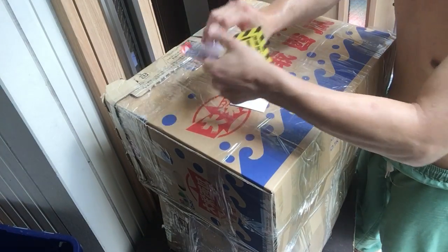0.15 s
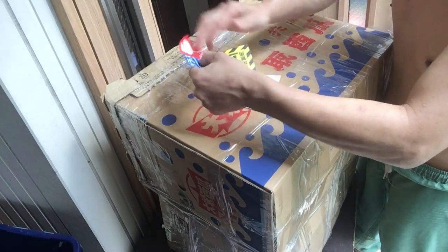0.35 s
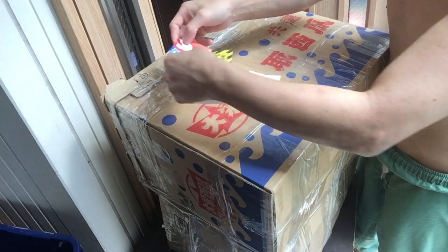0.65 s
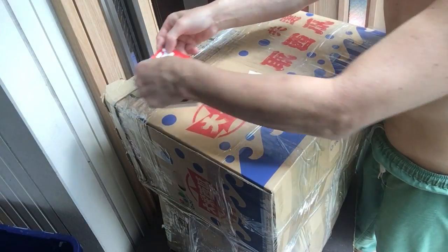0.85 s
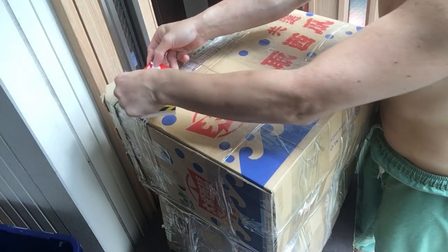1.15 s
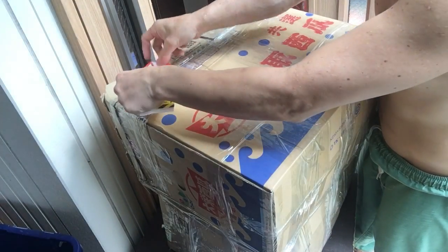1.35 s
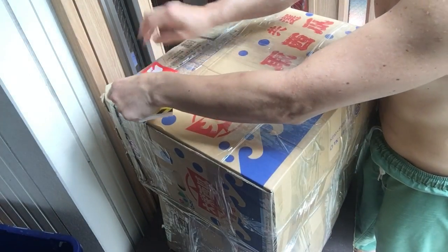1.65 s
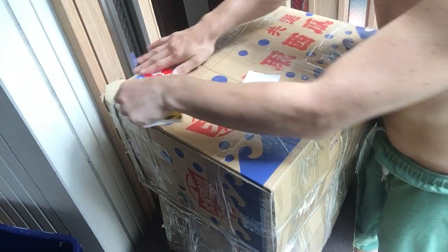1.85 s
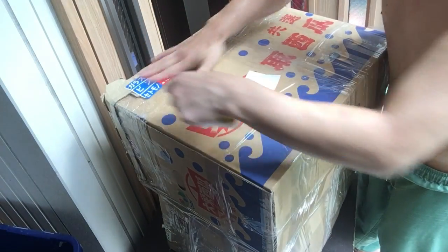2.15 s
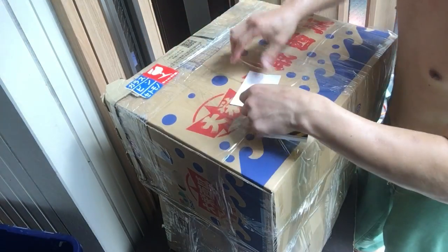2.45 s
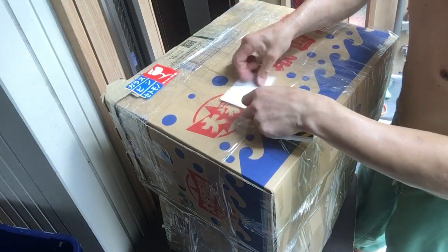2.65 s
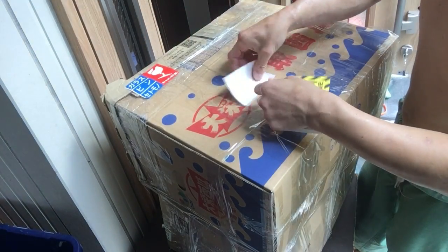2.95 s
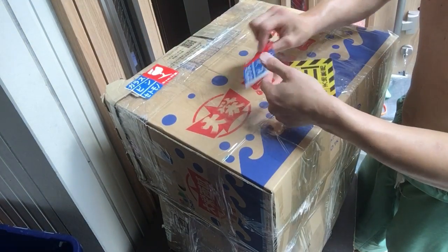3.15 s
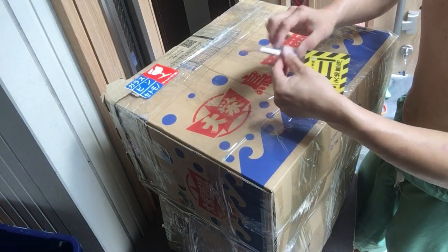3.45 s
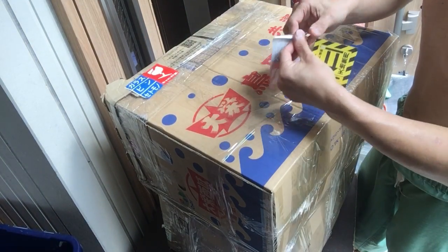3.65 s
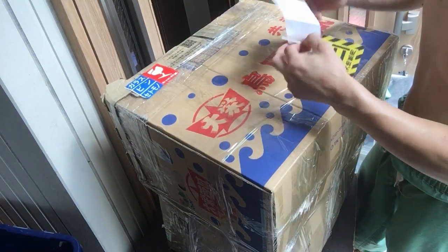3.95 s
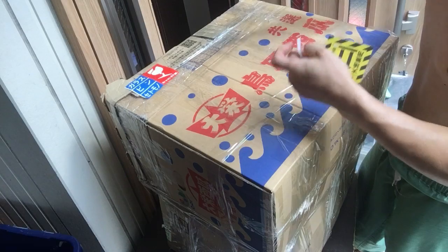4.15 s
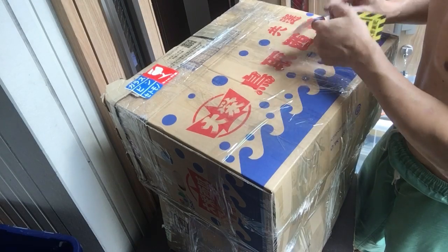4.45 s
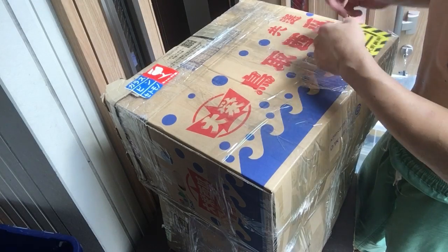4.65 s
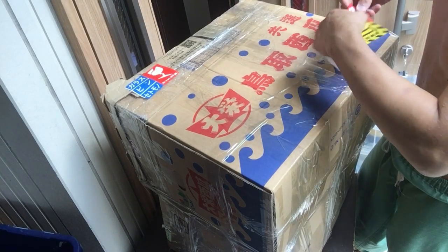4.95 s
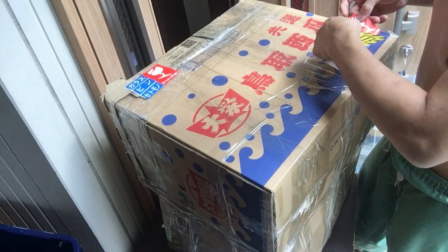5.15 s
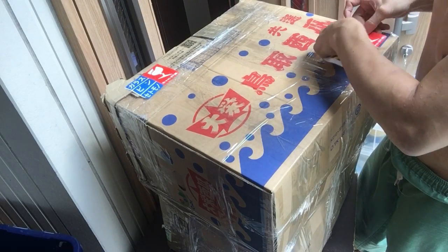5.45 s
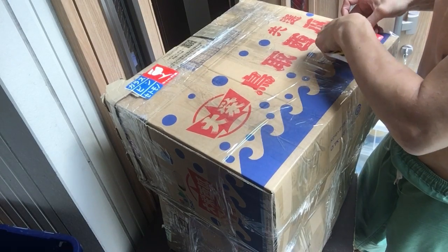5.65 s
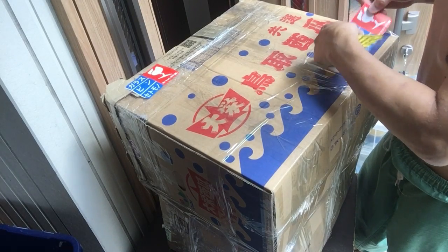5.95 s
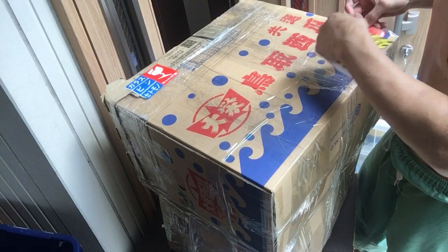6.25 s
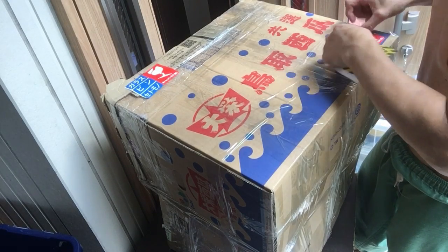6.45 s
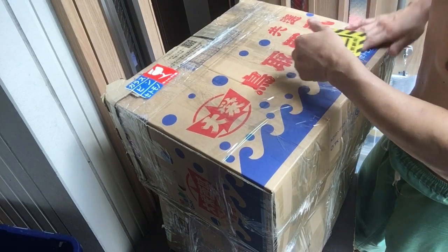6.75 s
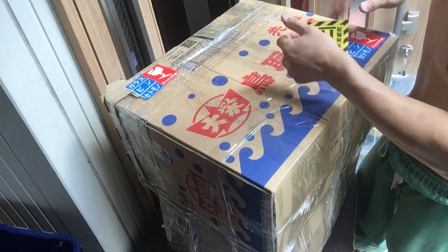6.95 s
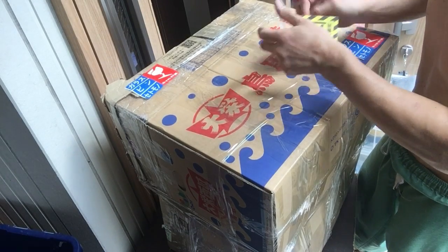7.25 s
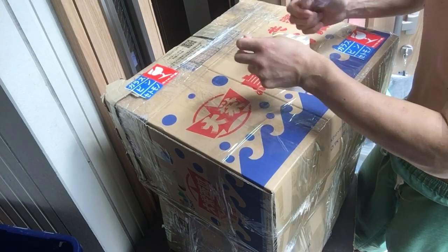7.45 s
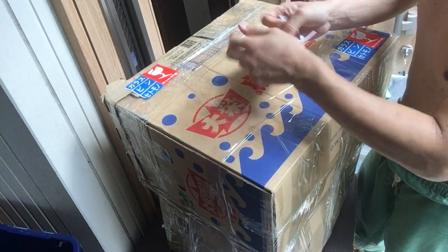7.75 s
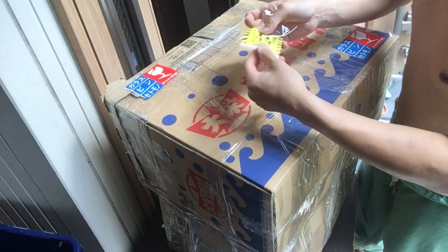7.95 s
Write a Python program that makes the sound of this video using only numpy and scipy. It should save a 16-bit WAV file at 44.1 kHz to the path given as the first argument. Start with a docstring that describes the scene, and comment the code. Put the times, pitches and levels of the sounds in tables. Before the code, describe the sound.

Stickers peel off their paper backing with sharp crackles and rustles, while fingers thud softly on a hollow, plastic-wrapped cardboard box.

```python
"""Sharp crackles and rustling: hands peel paper stickers off their backing and press them onto a
film-wrapped cardboard box in a small room. Creases in paper and film snap as they release stress,
glue and fingertips rustle by stick-slip friction, and fingers thud on the hollow box, exciting its modes.
Close walls give the snaps a short tail; beneath lie a wavering building rumble and two low drones."""
import sys
import numpy as np
from scipy import signal
from scipy.fft import rfft, irfft
from scipy.io import wavfile
from scipy.ndimage import uniform_filter1d

SR = 44100
rng = np.random.default_rng(int(sys.argv[2]) if len(sys.argv) > 2 else 0)


def master(y):
    """Save y as 16-bit WAV."""
    cut = np.clip(np.atleast_2d(y).T, -1, 1)
    pcm = np.round(cut * 32767)  # scale
    wavfile.write(sys.argv[1], SR, pcm.astype(np.int16))


N = 357651


def undb(db):
    """Decibels to amplitude ratio."""
    return 10 ** (np.asarray(db) / 20)


def unit(x):
    """Normalisation to rms 1."""
    return x / np.sqrt(np.mean(x ** 2))


def peak(x):
    """Normalisation to peak 1."""
    return x / np.max(np.abs(x))


def band(x, lo_hz, hi_hz):
    """Band-pass filtering."""
    return signal.sosfilt(signal.butter(2, [lo_hz, hi_hz], "band", fs=SR, output="sos"), x)


def resonance(x, hz, width_hz):
    """Second-order resonance, gain 1 at its centre."""
    return signal.lfilter(*signal.iirpeak(hz, hz / width_hz, fs=SR), x)


def decay(t, t60):
    """Exponential damping: 60 dB down after t60 seconds."""
    return np.exp(-np.log(1000) * t / t60)


def add(out, start_s, x):
    """Superposition of x on out from start_s."""
    i = int(start_s * SR)
    out[i:i + len(x)] += x[:len(out) - i]


def wander(rate_hz):
    """Random modulation: held values, smoothed twice, rms 1."""
    hold = int(SR / rate_hz)
    steps = np.repeat(rng.standard_normal(N // hold + 1), hold)
    return unit(uniform_filter1d(uniform_filter1d(steps, hold), hold)[:N])


# Creases letting go: (time [s], level [dB], resonance [Hz], treble [dB re level],
# body [dB re level], decay time constant [ms])
CREASES = [(0.033, -39, 5100, -20, -14, 5.1), (0.084, -34, 2280, -10, -16, 1.1),
           (0.181, -26, 3670, -9, -45, 1.6), (0.238, -31.5, 3870, -6, -36, 0.93),
           (0.292, -36, 5300, -2, -5, 1), (0.312, -23, 4100, -13, -44, 1.1),
           (0.3205, -31, 2000, -9, -34, 1.6), (0.332, -30.5, 1820, -15, -10, 1),
           (0.4606, -32.5, 5700, 10.5, -13, 1.1), (0.4665, -24, 1870, -27, -42, 6.8),
           (0.565, -32.5, 3860, -8, -10, 1.1), (0.589, -39.5, 3270, -9, -13, 1.6),
           (0.649, -36.5, 4250, -5, -35, 1), (0.682, -34, 4440, -20, -35, 0.76),
           (0.9207, -28.5, 1570, -2, -25, 1.9), (1.06, -45, 2210, -2, -11, 1.5),
           (1.3213, -34, 2820, -9, -11, 1.2), (1.3648, -32.5, 6400, 3, -23, 1.9),
           (1.378, -28.5, 1740, -4, -17, 4.7), (1.387, -20.5, 3130, -15, -32, 2.5),
           (1.4064, -18, 2980, -10, -16, 2.2), (1.425, -33, 1700, -19, -18, 1.6),
           (1.4438, -33, 2570, -8, -24, 2.3), (1.4664, -33, 3660, -16, -31, 3.9),
           (1.538, -31.5, 1710, -11, -1.5, 2.8), (1.737, -41.5, 2500, -8, -4, 2.8),
           (1.8447, -32, 3700, -10, -2.5, 2.7), (1.864, -25, 4600, -7, -9.5, 1.6),
           (1.960, -34, 3950, -6, -37, 1.2), (2.0222, -31.5, 2320, -4, -9, 2),
           (2.116, -47, 1420, -18, 8.5, 1.9), (2.385, -33, 2520, -2, -34, 1.6),
           (2.6057, -39.5, 1390, -10, 4.5, 1.2), (2.6526, -47, 1610, 7, -12, 1.4),
           (2.7398, -27, 1533, -0.5, -10, 2.3), (2.883, -48, 1420, -12, 5, 1.6),
           (2.906, -44.5, 1420, -15, 6, 1.1), (2.986, -39, 1580, -20, 2, 3),
           (3.01, -45, 2890, -20, -3, 1.3), (3.613, -41, 2900, -5, -14, 0.99),
           (3.733, -47.5, 3680, -7, -12, 2.1), (3.861, -19, 4660, -6.5, -31, 0.75),
           (4.016, -31, 3270, -14, -7, 1.8), (4.028, -27, 3500, -8, -40, 1.4),
           (4.091, -28, 5700, 3, -36, 1.6), (4.1123, -27.5, 3100, -19, -31, 1.6),
           (4.1434, -26, 3870, -18, -32, 1.2), (4.1605, -20, 5700, 2, -44, 2.6),
           (4.178, -33, 4140, 12, -24, 1.4), (4.231, -24.5, 4530, 5, -19, 1.8),
           (4.255, -21.5, 3280, -1.5, -14.5, 1.5), (4.405, -26, 3520, -8, -13.5, 3.9),
           (4.576, -25, 3400, -12, -25, 2.2), (4.6167, -34, 5470, -9, -19, 1.3),
           (4.6291, -20, 3840, -4, -45, 1.9), (4.835, -29.5, 3130, 5, -33, 0.75),
           (4.912, -43, 5170, 5, -4, 1.2), (4.9753, -21.5, 3500, -2, -13, 3),
           (5.046, -34, 2230, -16, -28, 1.6), (5.0787, -33, 1440, 2.5, -32, 1.2),
           (5.107, -33, 2180, 1, -16, 1.4), (5.4037, -31.5, 2580, -5, -32, 0.68),
           (5.433, -50, 5500, 0, -18, 1), (5.4558, -29, 2500, -18, -29, 1),
           (5.4661, -25, 2700, 4.5, -13, 2), (5.47, -19, 2950, -32, -17, 0.95),
           (5.522, -30.5, 4700, 3, -4, 1.2), (5.5382, -24, 3400, -23, -12, 1.6),
           (5.5647, -33, 1510, -1, -24, 1.4), (5.6348, -34, 3270, -8, -30, 4),
           (5.6597, -31.5, 1500, -9, -27, 2.5), (5.72, -47, 1450, -16, 8, 1.2),
           (5.8023, -24, 2460, -22, -41, 0.63), (5.893, -37, 2140, -12, -11, 1),
           (5.9775, -29.5, 1960, 1, -21, 1.5), (5.986, -24.5, 1470, -9, -36, 1),
           (6.0376, -20, 1540, -1, -29, 2.4), (6.045, -26.5, 2620, -15, -28, 1.7),
           (6.056, -29.5, 2360, -5, -18, 3.5), (6.148, -42, 1430, -12, -3.5, 1.8),
           (6.377, -27.5, 2770, -12, -37, 1.8), (6.444, -36, 2400, -1, -12, 1.2),
           (6.497, -36, 2420, -2, -10, 1.2), (6.511, -23, 1420, -8, 0.5, 3.2),
           (6.535, -27.5, 3800, -4, -14, 3.6), (6.542, -19.5, 3600, 1.5, -20, 1.8),
           (6.6408, -34.5, 2500, 0.5, -37, 1), (6.707, -36, 2010, -12, -32, 3.8),
           (6.747, -22.5, 6050, -3, -12, 1.3), (6.7976, -34.5, 1580, -6, 2.5, 3.5),
           (6.805, -40.5, 1640, -15, 9, 1.9), (6.86, -33.5, 2450, -3, -28, 3.7),
           (7.195, -23.5, 4400, -5, -32, 3.8), (7.202, -22.5, 4600, -22, -30, 0.7),
           (7.212, -21, 4480, 5, -21, 1.7), (7.235, -34, 3600, -15, -30, 2),
           (7.304, -28, 3260, -22, -15, 1.3), (7.363, -17.5, 3900, -27, -32, 6.4),
           (7.369, -29, 1970, 12.5, -34, 1.7), (7.397, -25.5, 2250, -2, -34, 2.8),
           (7.4113, -25.5, 3230, -15, -22, 1), (7.452, -17.5, 3480, -0.5, -33, 0.7),
           (7.47, -28, 4350, -7, -28, 1.2), (7.476, -28, 3570, -11, -28, 1.3),
           (7.508, -29.5, 2400, 13, -31, 1.8), (7.5097, -15, 2490, -30, -34, 3.1),
           (7.522, -19, 3270, 3.5, -31, 1.2), (7.565, -25.5, 2500, -22, -30, 2),
           (7.574, -20, 3780, -22, -25, 1.4), (7.5915, -18, 3750, -31, -25.5, 1.2),
           (7.6331, -20, 3100, -20, -34, 1.5), (7.6545, -15.5, 4360, 1, -41, 0.92),
           (7.678, -19, 5400, -20, -36, 0.7), (7.699, -28, 3880, 4, -6, 1.9),
           (7.728, -14, 3460, -8, -28, 0.83), (7.778, -21.5, 2480, -15, -34, 0.68),
           (7.799, -16, 4300, -10, -33, 1.5), (7.8036, -22, 4700, 12.5, -36, 0.77),
           (7.807, -16, 4700, -22, -26, 1.1), (7.867, -33, 2480, -22, -9, 1.5),
           (7.8815, -13.5, 2730, 1, -32, 0.73), (7.979, -41, 4100, -14, -32, 2)]
def snaps():
    """Impulsive excitation: a crease releases a noise burst, filtered by its patch of sheet."""
    out, t = np.zeros(N), np.arange(1024) / SR
    echo_db, echo_burst_s = -5, 0.00048
    noises = rng.standard_normal((len(CREASES), len(t)))
    for (start_s, db, hz, treble_db, body_db, decay_ms), noise in zip(CREASES, noises):
        def sheet(burst):
            patch = peak(peak(resonance(burst, hz, 0.27 * hz)) + 1.07 * peak(band(burst, 1516, 6620)))
            treble = undb(treble_db) * peak(band(burst, 5500, 17000))
            body = undb(body_db) * peak(band(burst, 600, 1750))
            return patch + treble + body
        snap = undb(db) * sheet(noise * np.exp(-t * 1000 / decay_ms))
        add(out, start_s, snap)
        # a very short burst feeds the echo, so the tail is a smooth hush without a pitched ping
        tail = wall_echoes(sheet(noise * np.exp(-t / echo_burst_s)))
        add(out, start_s, undb(echo_db) * np.linalg.norm(snap) * tail)
    return out


# Peels, rubs and crinkles: (time [s], hold [s], fade [dB/s], sheet [dB], hiss [dB], cardboard [dB])
STROKES = [(0.064, 0.018, 223, -57, -64, -70), (0.195, .01, 190, -53.5, -64, -62),
           (0.304, .02, 176, -48.5, -55, -55), (0.437, .03, 300, -57.5, -59, -60),
           (0.47, 0.014, 352, -44, -57, -55), (0.578, 0.011, 400, -52, -59, -56),
           (0.636, 0.26, 100, -61.5, -68, -62.5), (0.921, 0.009, 152, -49, -55, -55.5),
           (1.136, 0.015, 80, -64, -73, -68), (1.257, .04, 100, -55.5, -65, -69),
           (1.30, 0.069, 200, -58.5, -61, -61), (1.374, 0.028, 170, -43.5, -60, -48),
           (1.465, .02, 51, -59, -66, -72), (1.60, 0.035, 152, -64.5, -65, -62),
           (1.736, 0.016, 92, -67.5, -67, -72), (1.86, 0.0079, 109, -53, -57.5, -65),
           (2.01, .02, 34, -57, -63.5, -70), (2.167, 0.21, 220, -56.5, -58.5, -61.5),
           (2.618, 0.063, 300, -55.5, -60, -51.5), (2.738, 0.007, 174, -52.5, -60, -53),
           (2.895, 0.056, 150, -53, -59, -52), (2.997, 0.046, 83, -48.5, -55, -52.5),
           (3.13, 0.068, 400, -58.5, -59, -79), (3.392, .02, 200, -67.5, -73, -78),
           (3.472, 0.14, 88, -65.5, -72, -77), (3.844, .02, 53, -59.5, -61, -68),
           (4.006, .07, 100, -49.5, -56, -60), (4.073, 0.066, 96, -46, -49.5, -56),
           (4.158, 0.039, 105, -42, -49, -66), (4.4, 0.011, 295, -46, -52, -71),
           (4.557, 0.018, 100, -50.5, -69, -55), (4.585, .01, 168, -48, -52, -55),
           (4.833, .01, 306, -52.5, -60, -60), (4.982, .01, 79, -46.5, -59, -56),
           (5.396, 0.025, 100, -62, -67, -57), (5.505, 0.049, 210, -44, -49.5, -51.5),
           (5.656, 0.018, 195, -48.5, -64, -58), (5.8, 0.008, 179, -51.5, -69, -54.5),
           (5.968, 0.024, 300, -49, -56, -58), (6.044, 0.0084, 267, -42.5, -53, -46),
           (6.146, 0.018, 30, -74, -79, -59.5), (6.376, .01, 58, -59, -72, -54),
           (6.482, .03, 100, -63, -62, -52), (6.525, 0.0071, 151, -47, -52, -46.5),
           (6.753, .01, 500, -45.5, -58, -69), (6.821, 0.061, 155, -54, -58.5, -57),
           (7.212, 0.017, 96, -42, -50.5, -56), (7.375, 0.0085, 166, -38.5, -52, -59),
           (7.452, 0.011, 400, -44, -45.5, -59), (7.522, 0.0074, 130, -35.5, -39.5, -58),
           (7.268, 0.046, 200, -49, -54, -56), (7.62, 0.25, 150, -46.5, -53.5, -65),
           (7.88, 0.0078, 205, -59, -53, -73), (7.98, 0.093, 21, -60, -70, -79)]
# Hands at rest: (sheet [dB], hiss [dB], cardboard [dB])
RESTING_LEVELS = [-85, -99, -67.5]
def stroke_envelopes():
    """Incoherent addition: strokes rise, hold and fade, and their powers sum."""
    t, rise_db_per_s = np.arange(0, N, 64) / SR, 897
    start, hold, fade, *levels = np.transpose(STROKES)[:, :, None]
    shape_db = -rise_db_per_s * np.maximum(start - t, 0) - fade * np.maximum(t - start - hold, 0)
    powers = [undb(rest_db) ** 2 + np.sum(undb(db + shape_db) ** 2, axis=0)
              for db, rest_db in zip(levels, RESTING_LEVELS)]
    return [np.interp(np.arange(N) / SR, t, np.sqrt(power)) for power in powers]


# Resonances of the sheet: (frequency [Hz], bandwidth [Hz], relative level [dB])
SHEET_MODES = [(1730, 400, -41), (2320, 930, 17.5), (3450, 1320, 12), (4900, 6500, -16), (6050, 2700, 17.5)]
def rustle():
    """Stick-slip friction: countless tiny slips of glue and skin excite sheet and cardboard."""
    slips_per_s, scatter_db, slip_decay_s, rub_gain = 970, 2.5, 0.0022, 0.8
    sizes = undb(scatter_db * np.minimum(rng.exponential(size=N), 3.0))
    onsets = sizes * (rng.random(N) < slips_per_s / SR)
    slip_envelope = signal.lfilter([1], [1, -np.exp(-1 / (slip_decay_s * SR))], onsets)
    slips = unit(slip_envelope * rng.standard_normal(N))
    rub = rub_gain * rng.standard_normal(N)
    friction = (slips + rub) * undb(2.0 * wander(60))  # the pull is never even
    # as the sheet bends, now one resonance and now another stands out
    modes = sum(undb(db + 2.5 * wander(30)) * resonance(friction, hz, width)
                for hz, width, db in SHEET_MODES)
    sheet = unit(band(modes, 1920, 5140))
    hiss = unit(band(friction, 6500, 15000))
    cardboard = unit(band(friction, 192, 2060))
    sheet_gain, hiss_gain, cardboard_gain = stroke_envelopes()
    return sheet_gain * sheet + hiss_gain * hiss + cardboard_gain * cardboard


# Modes of a box panel: (frequency [multiple of panel pitch], relative level [dB], T60 [s])
PANEL_MODES = [(1.002, -5, 0.12), (1.15, -7.5, 0.058), (1.7, -10.5, 0.16), (2.3, -8.5, 0.033)]
# Fingers on the box: (time [s], level [dB], panel pitch [Hz], air boom [dB re level], contact [ms])
PRESSES = [(1.317, -36.5, 212, -22, 0.82), (1.27, -46, 385, -23, 1.7), (1.345, -37, 367, -23, 1.7),
           (1.37, -39, 393, -23, 2), (1.849, -33.5, 183, 6.5, 1), (2.108, -43, 369, -21, 2.2),
           (2.436, -39.5, 188, -16, 2.3), (2.607, -35, 143, -9, 7.2), (2.606, -20.5, 197, -32, 4.1),
           (2.651, -26, 177, -22, 1.7), (2.685, -33.5, 222, -1, 3.4), (2.743, -27.5, 187, -18, 1),
           (2.813, -38, 181, -18, 1.9), (2.883, -35.5, 170, -9, 1.3), (2.987, -28, 169, -28, 1.7),
           (3.026, -40.5, 216, -1, 4.7), (5.419, -37, 229, -19, 1.1), (5.517, -39, 197, -10, 1.1),
           (6.412, -37, 212, -9, 3.2), (6.49, -35, 231, -14, 1), (6.512, -22.5, 227, -10, 0.82),
           (6.541, -33, 193, -9, 1.9), (6.591, -41, 405, -3, 3.1), (6.799, -23.5, 191, -12, 2.4),
           (6.81, -16.5, 232.6, -17.5, 1.9), (6.836, -34, 226, -20, 4.4)]
def thuds():
    """Modal response: a push rings the panel and the enclosed air; longer contact sounds duller."""
    out, t = np.zeros(N), np.arange(SR // 4) / SR
    def mode(hz, t60):
        return np.sin(2 * np.pi * hz * t) * decay(t, t60)
    for start_s, db, hz, boom_db, contact_ms in PRESSES:
        push = np.hanning(int(contact_ms * SR / 1000))
        modes = sum(undb(mode_db) * mode(ratio * hz, t60) for ratio, mode_db, t60 in PANEL_MODES)
        panel = peak(np.convolve(modes, push))
        boom = peak(np.convolve(mode(hz=74, t60=0.088), push))
        add(out, start_s, undb(db) * (panel + undb(boom_db) * boom))
    return out


# Reverberation bands of the room: (frequency [Hz], T60 [s], relative level [dB])
ROOM_BANDS = [(720, 0.15, -17), (2205, 0.13, 3), (4780, 0.073, 5), (9260, 0.12, 3.5)]
def wall_echoes(x):
    """Diffuse reverberation: convolution with decaying noise, a new pattern for every spot."""
    t, build_up_s = np.arange(SR // 6) / SR, 0.00056
    noise = rng.standard_normal(len(t))
    tail = sum(undb(db) * band(noise, hz / 2.3, hz * 1.51) * decay(t, t60) for hz, t60, db in ROOM_BANDS)
    tail *= np.clip(t / build_up_s, 0, 1) ** 2
    return signal.fftconvolve(x / np.linalg.norm(x), tail / np.linalg.norm(tail))


# Spectrum of the building's rumble: (frequency [Hz], relative spectral density [dB])
RUMBLE_SPECTRUM = [(20, -34), (45, -4.5), (90, -9), (160, -9), (330, -16), (500, -27.5), (1300, -25),
                   (2200, -29), (4000, -41), (7000, -52), (16000, -47)]
def rumble(level_db=-54.5):
    """Amplitude modulation: half-octave bands of distant noise swell together and flicker singly."""
    hz = np.maximum(np.fft.rfftfreq(N, 1 / SR), 1)
    knot_hz, knot_db = np.transpose(RUMBLE_SPECTRUM)
    spectrum = rfft(rng.standard_normal(N)) * undb(np.interp(np.log(hz), np.log(knot_hz), knot_db))
    out, swell_db = np.zeros(N), 0.81 * wander(1.0)
    for octave in np.arange(4, 14.5, .5):  # centres from 16 Hz to 16 kHz
        share = np.clip(1 - 2 * np.abs(np.log2(hz) - octave), 0, 1)
        out += irfft(spectrum * share, N) * undb(swell_db + 1.09 * wander(3.3))
    return undb(level_db) * unit(out)


# Course of two drones, perhaps far machines or traffic: (time [s], deep level [dB], higher level [dB])
DRONE_LEVELS = [(0.0, -46, -54), (0.29, -57, -64), (0.5, -52, -62), (1.2, -56.5, -65), (1.69, -53, -63),
                (2.44, -52, -62), (2.82, -49, -57), (2.94, -53, -51.5), (4.13, -54.5, -66.5),
                (4.4, -54, -53), (4.63, -52, -67), (5.33, -61, -58), (5.849, -57, -52.5), (6.23, -56, -64),
                (6.82, -53, -58.5), (7.05, -54, -59), (8.11, -62, -65)]
# Their bands: (frequency [Hz], resonator bandwidth [Hz])
DRONE_BANDS = [(58, 21), (100, 13)]
def drones():
    """Narrow-band noise: two low, faintly pitched drones come and go."""
    out, t = np.zeros(N), np.arange(N) / SR
    times, *levels = np.transpose(DRONE_LEVELS)
    for db, (hz, width) in zip(levels, DRONE_BANDS):
        drone = resonance(resonance(rng.standard_normal(N), hz, width), hz, width)
        out += undb(np.interp(t, times, db)) * unit(drone)
    return out


def scene():
    """Superposition: hands and box over the building's background, in one channel."""
    return (snaps() + rustle() + thuds() + rumble() + drones())[None]


def record(dry):
    """Frequency response of the microphone: a dip, a dull top, no deep bass and a steep cut-off."""
    dull_hz, bass_cut_hz, top_hz = 10300, 38, 15900
    x = dry - 0.41 * resonance(dry, hz=10580, width_hz=1260)
    x = signal.sosfilt(signal.butter(1, dull_hz, fs=SR, output="sos"), x)
    x = signal.sosfilt(signal.butter(6, bass_cut_hz, "high", fs=SR, output="sos"), x)
    return signal.sosfilt(signal.ellip(8, .2, 70, top_hz, fs=SR, output="sos"), x)


dry = scene()
out = record(dry)
master(out)
```